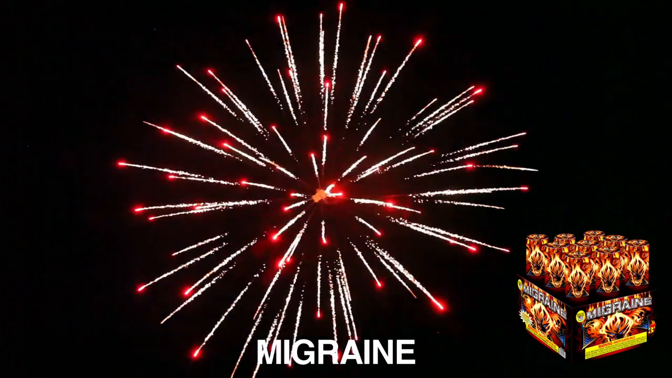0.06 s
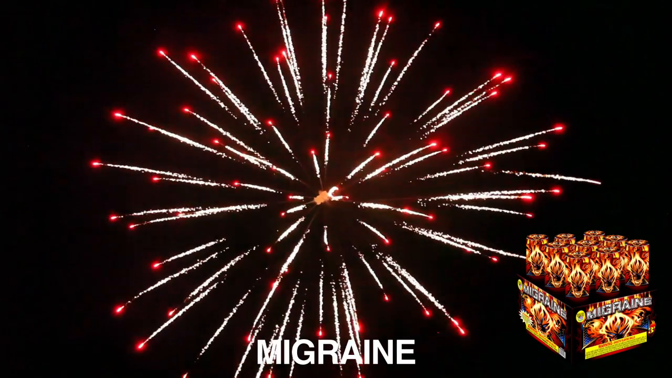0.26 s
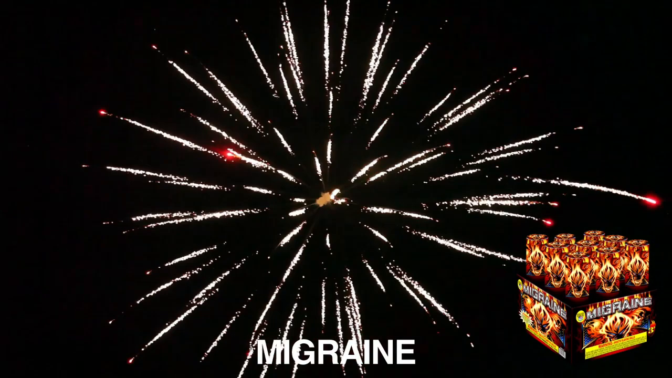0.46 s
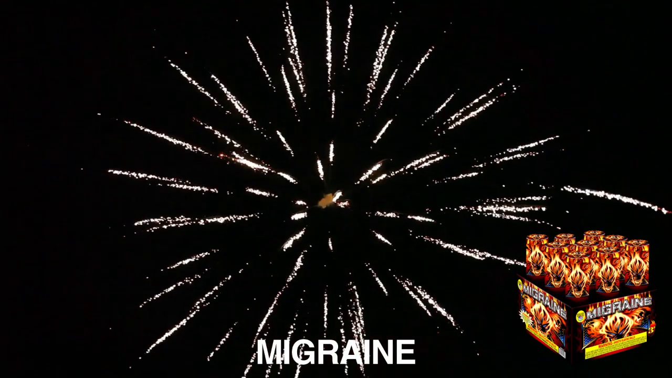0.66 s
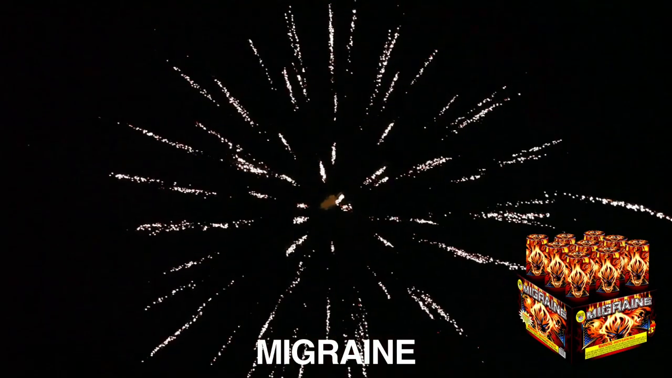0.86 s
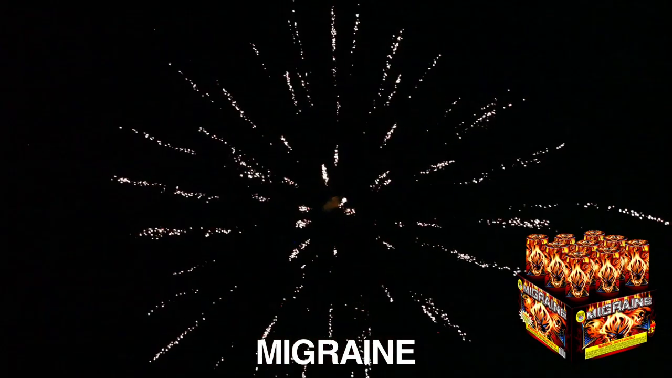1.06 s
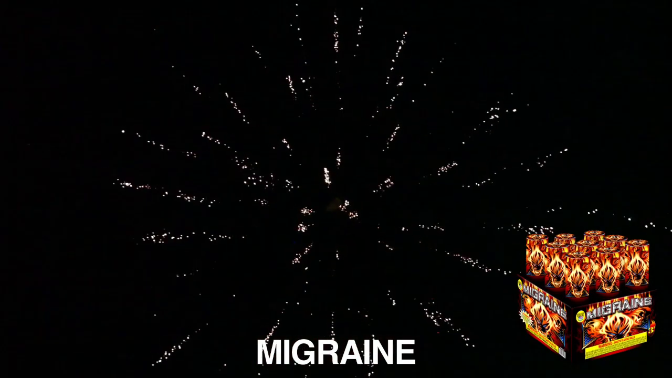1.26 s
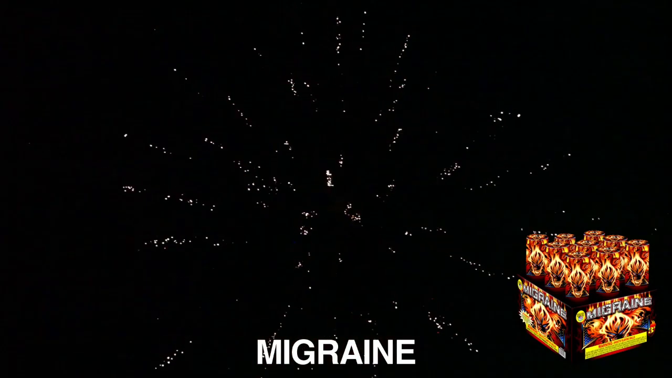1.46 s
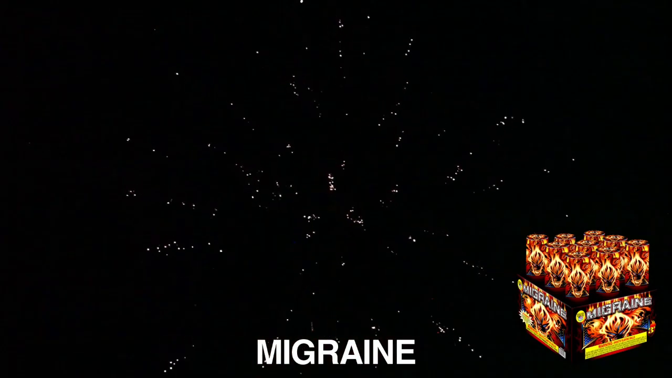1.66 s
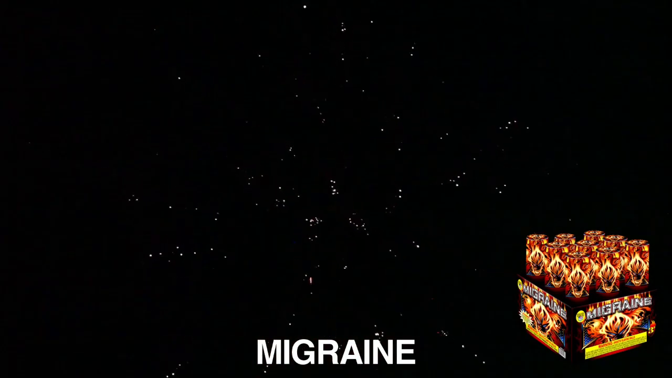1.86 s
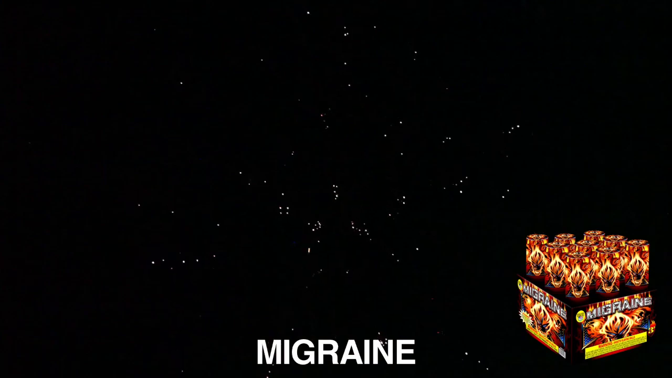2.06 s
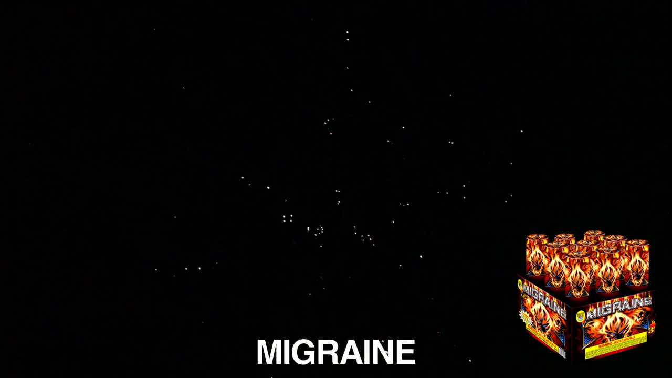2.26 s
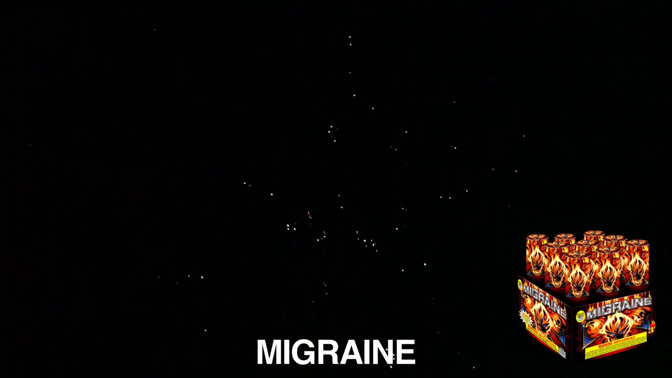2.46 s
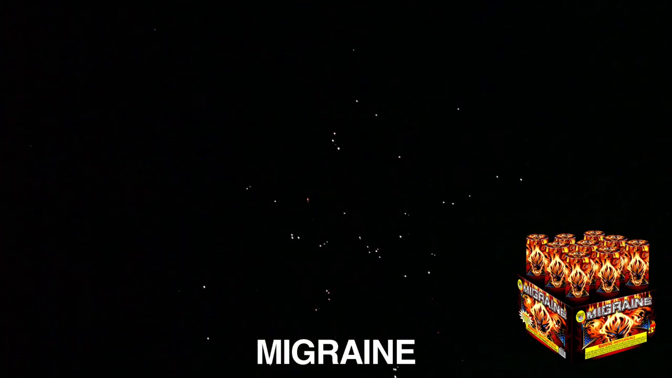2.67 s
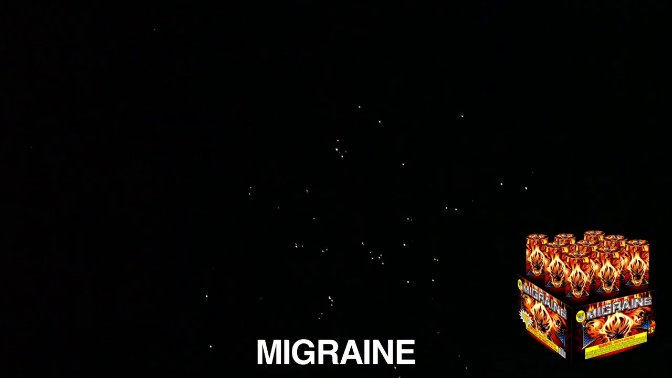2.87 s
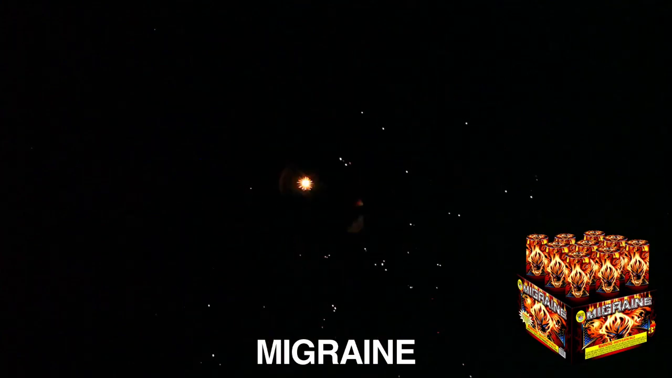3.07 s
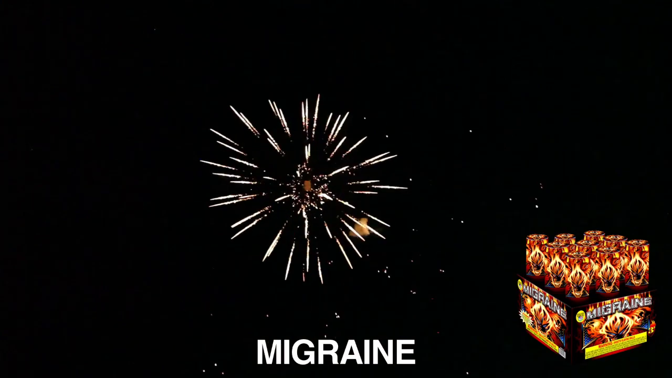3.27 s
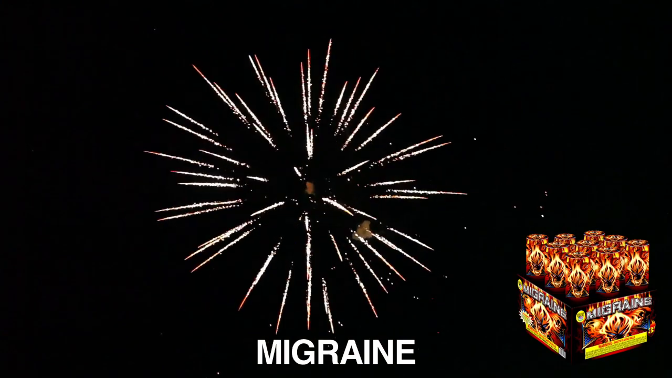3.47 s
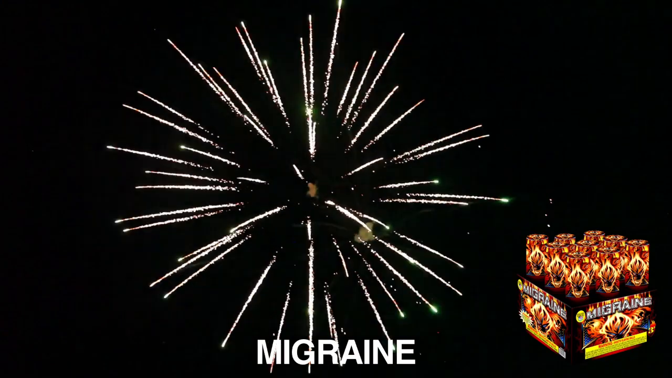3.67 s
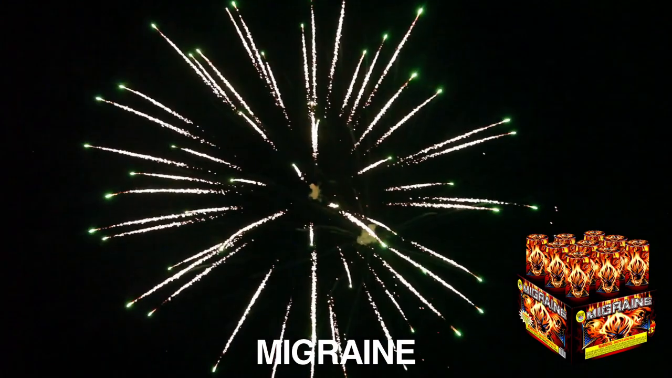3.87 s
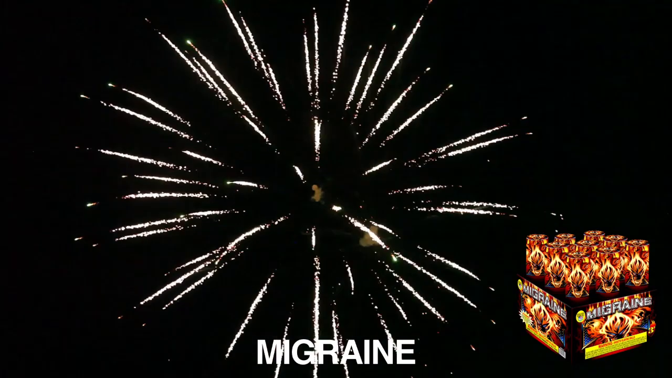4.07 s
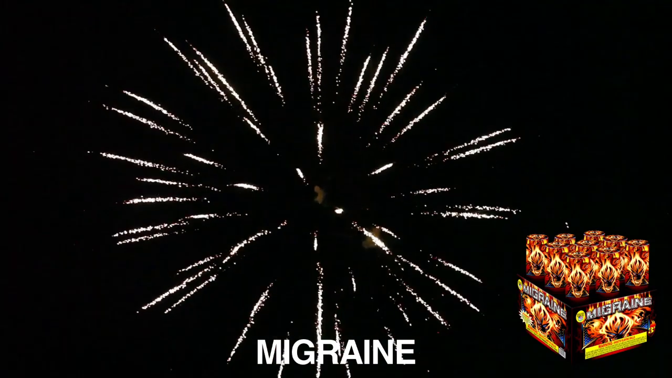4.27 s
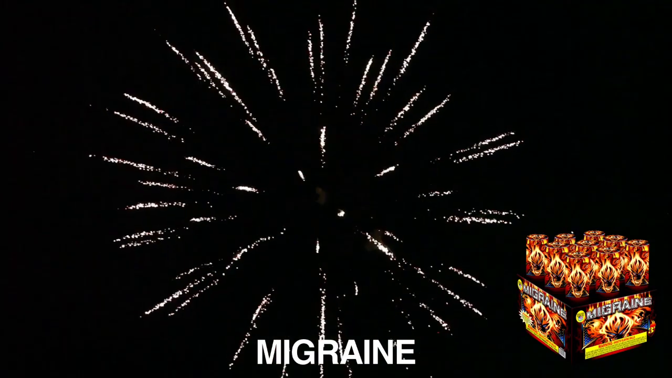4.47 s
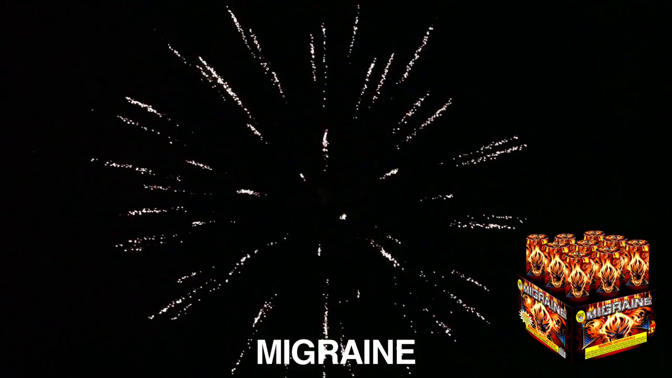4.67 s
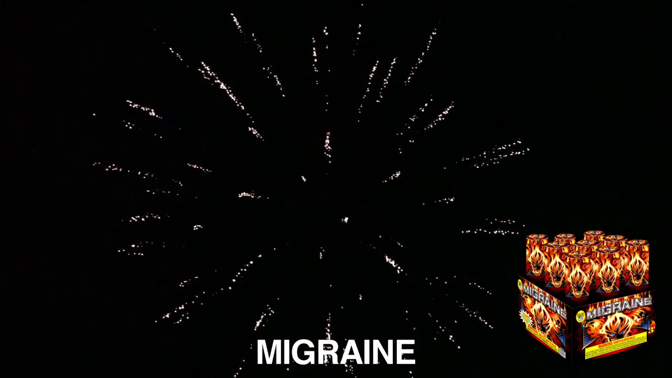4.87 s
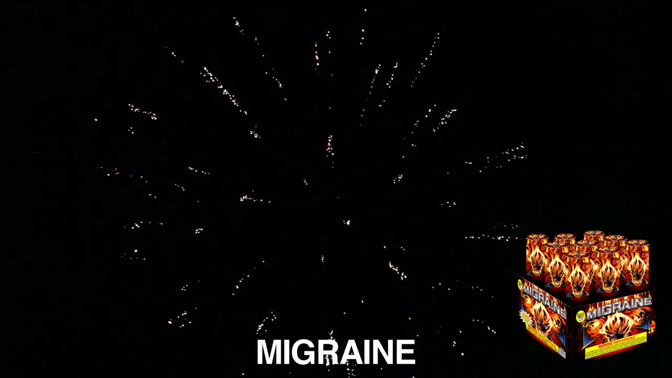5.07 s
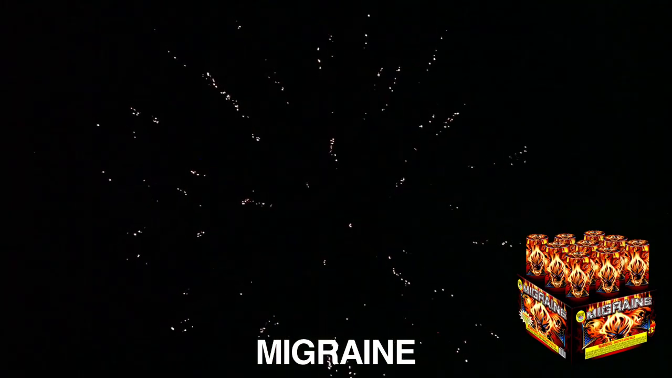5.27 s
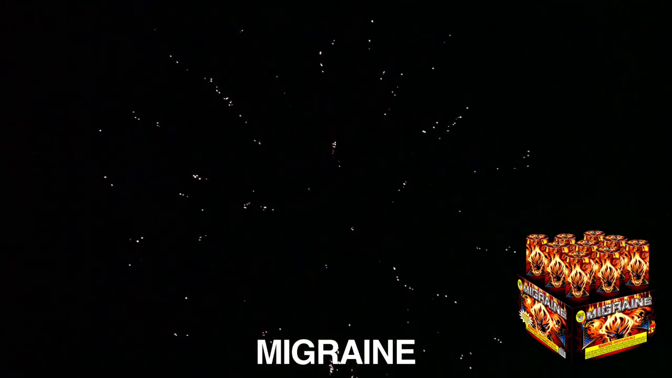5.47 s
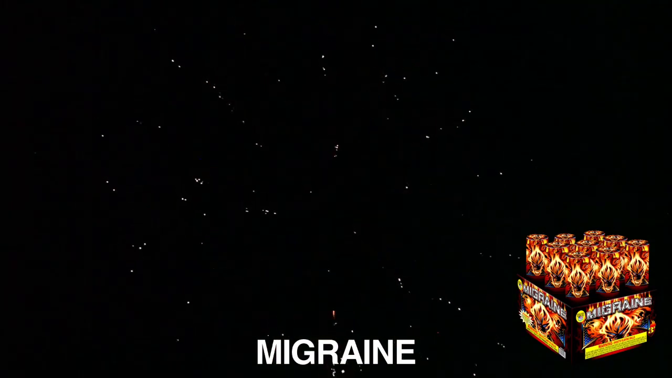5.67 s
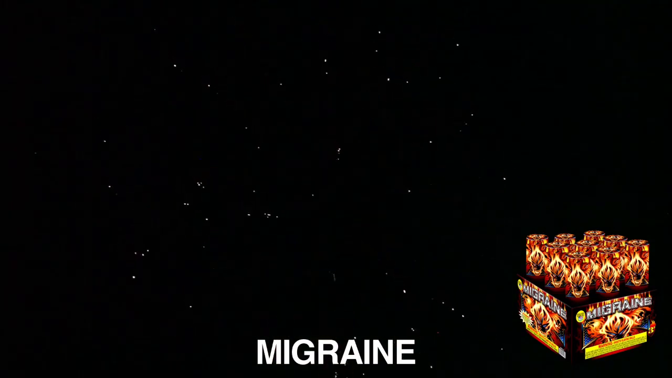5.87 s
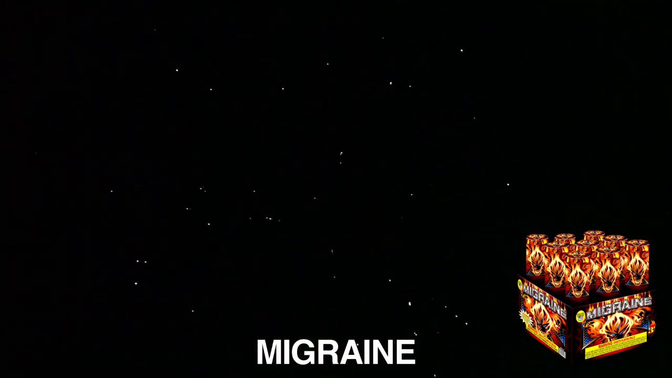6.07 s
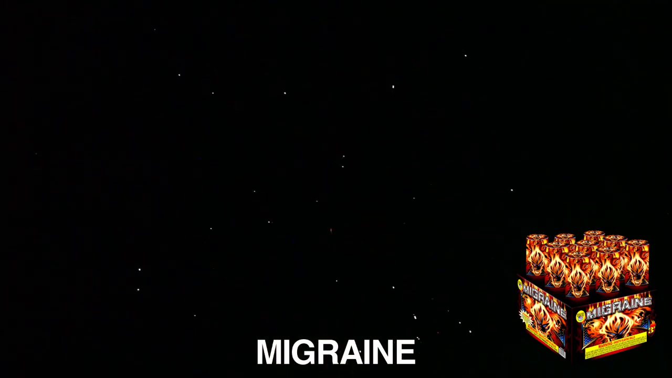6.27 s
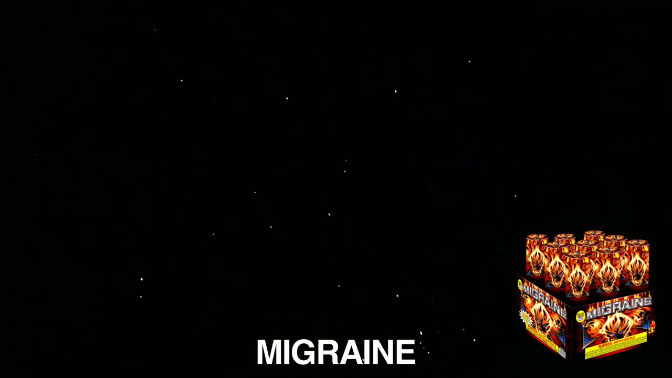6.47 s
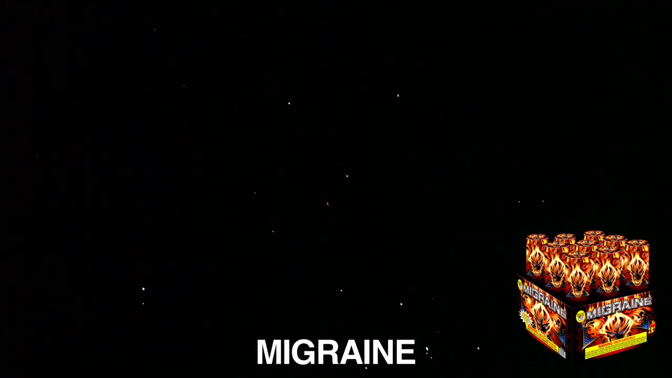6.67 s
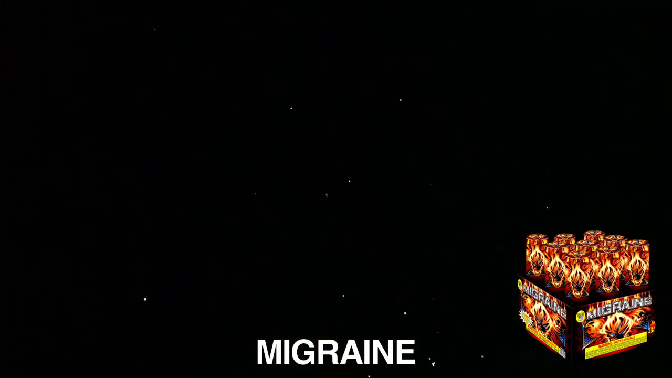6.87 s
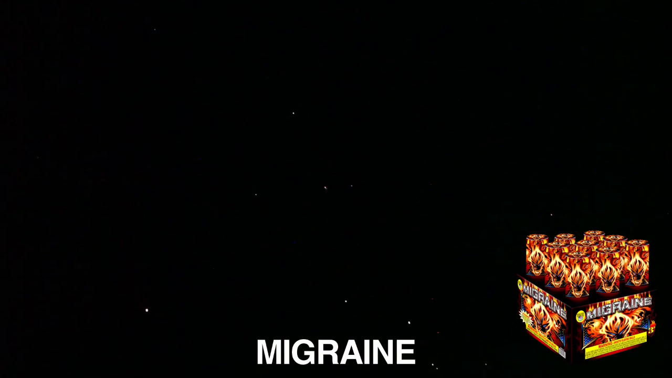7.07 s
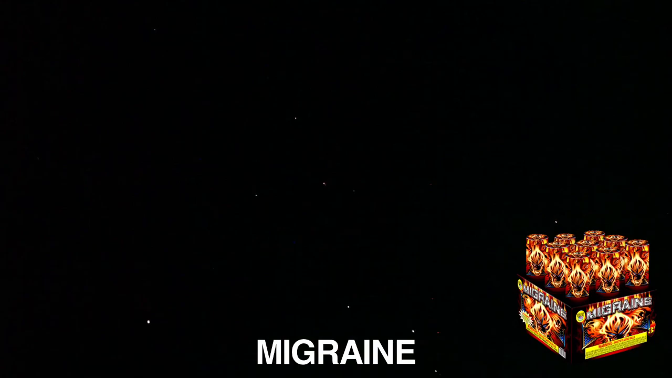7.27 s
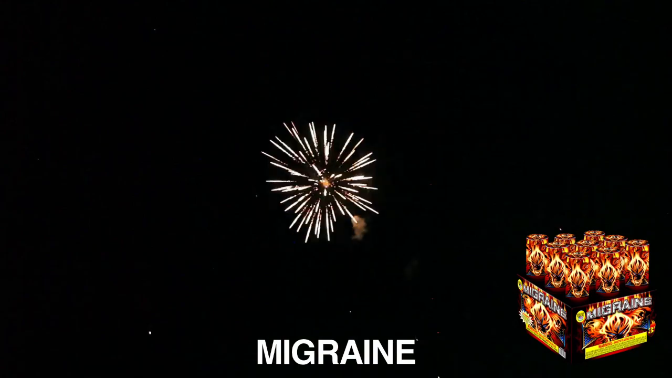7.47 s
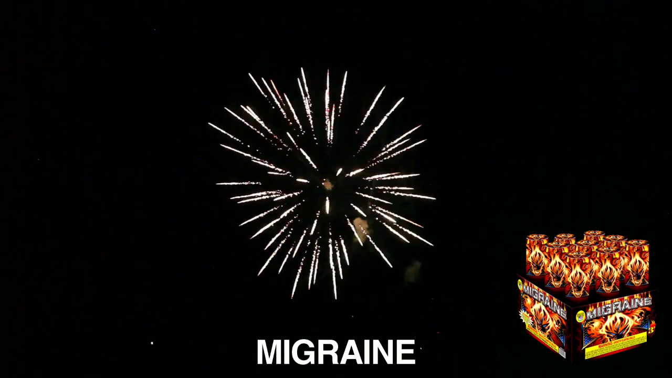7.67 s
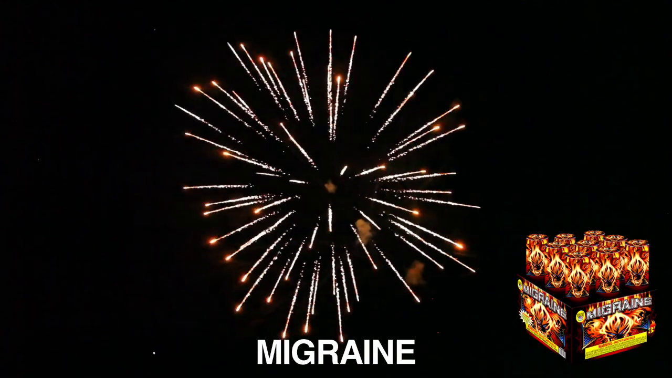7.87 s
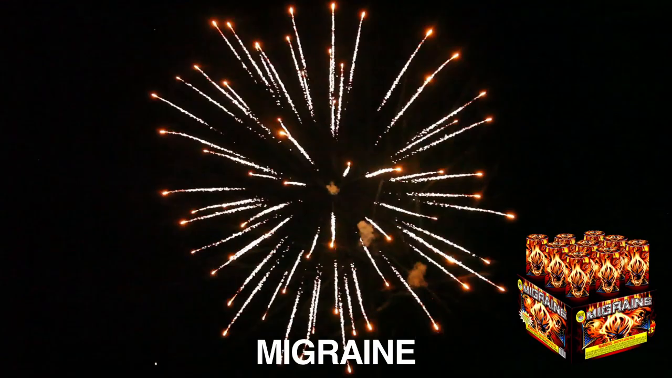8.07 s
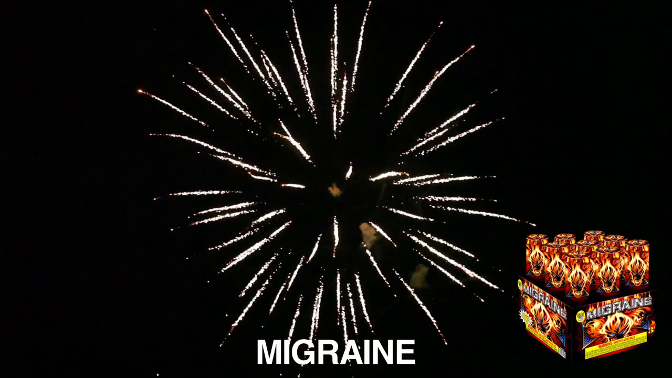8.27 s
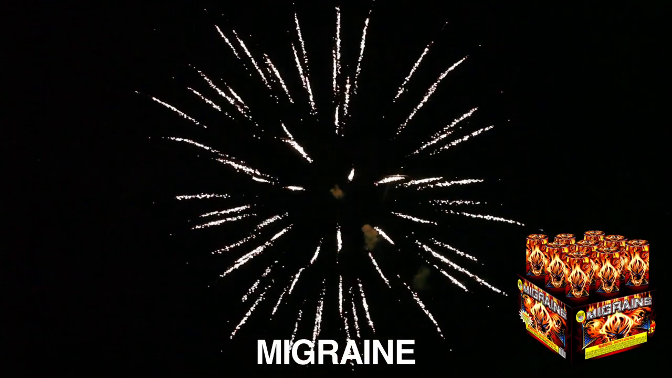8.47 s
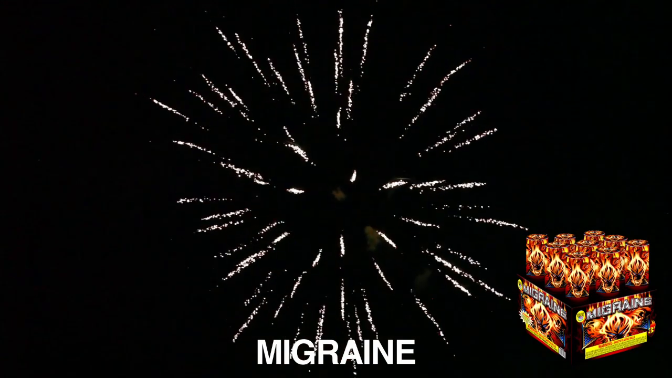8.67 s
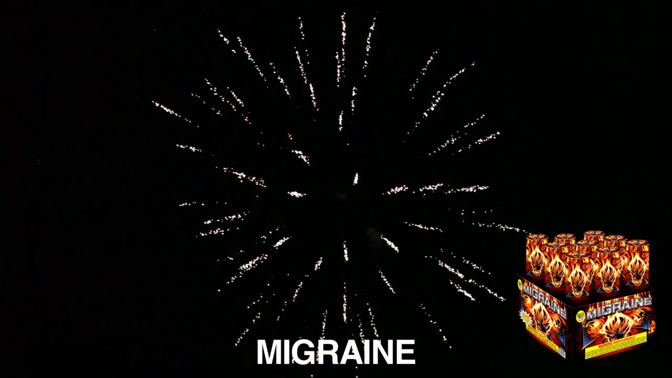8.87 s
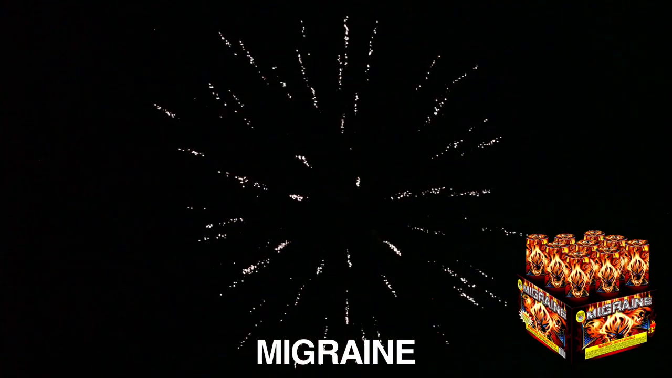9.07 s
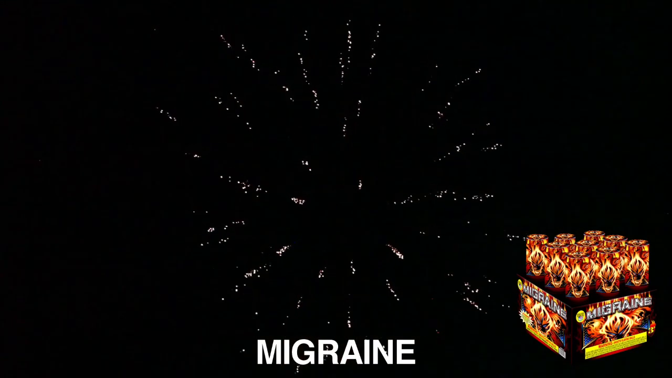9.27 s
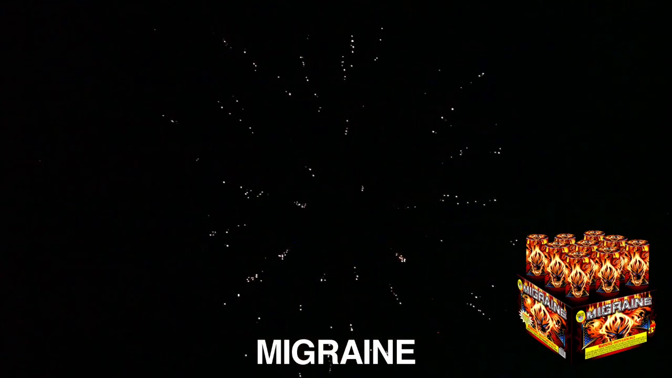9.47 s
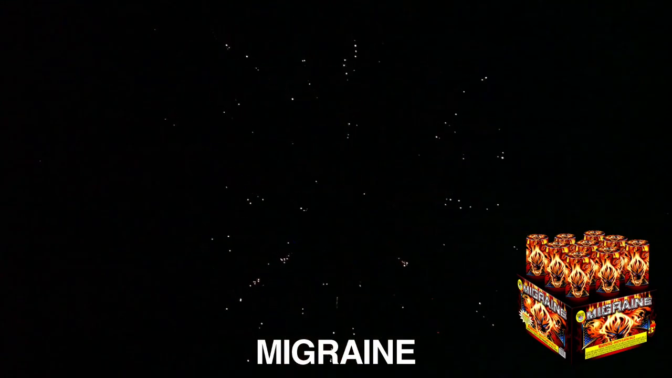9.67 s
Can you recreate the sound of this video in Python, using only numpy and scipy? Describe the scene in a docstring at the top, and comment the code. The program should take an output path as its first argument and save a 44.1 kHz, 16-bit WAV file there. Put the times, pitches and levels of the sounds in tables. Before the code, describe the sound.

Opens on the ducked, rolling echo of a firework burst just past. A mortar thumps with a small puff, a thin fuse hiss rises, and a shell explodes in a clipped boom and crack. Echoes roll off woods and slopes, growing duller, while stars sizzle. Another launch brings puffs and fluttering whirrs, then a second burst; a final launch thuds near the end. The overloaded microphone ducks and slowly recovers, lifting the hiss.

```python
"""A firework cake at night in open, wooded country, opening on the echo of a shell that has just burst.
A mortar thumps, a bright puff follows, a fuse hisses faintly, and the second shell bursts: shock, boom, crack.
The next shell leaves with more puffs, whirrs as it tumbles upward, hisses and bursts; a last mortar fires.
Woods, ground and slopes return each bang as coloured noise, ever duller; burning stars sizzle after each burst.
Bangs overload the microphone channel; its gain control ducks, then slowly lifts echoes and night hiss."""
import sys
import numpy as np
from scipy import signal
from scipy.fft import rfft, irfft, next_fast_len
from scipy.io import wavfile
from scipy.ndimage import uniform_filter1d, minimum_filter1d

SR = 44100
rng = np.random.default_rng(int(sys.argv[2]) if len(sys.argv) > 2 else 0)


def store_pcm(level_fs):
    """Save levels as 16-bit WAV."""
    pcm = np.round(np.clip(level_fs, -1, 1) * 32767).astype(np.int16)
    wavfile.write(sys.argv[1], SR, np.atleast_2d(pcm).T)


N = 429093
TIME = np.arange(N) / SR


def amp(db):
    """Amplitude factor of a level in dB."""
    return 10 ** (np.asarray(db) / 20)


def evened(x):
    """Scales to rms 1."""
    return x / np.sqrt(np.mean(x ** 2) + 1e-20)


def read(points, hz):
    """A spectrum in dB, joined on a log-frequency axis."""
    f, db = np.transpose(points)
    return np.interp(np.log(hz + 1), np.log(f), db)


def add(mix, s, sound):
    """Mixes in a sound that starts at s seconds, trimmed to the scene."""
    start = round(s * SR)
    sound = sound[max(-start, 0):]
    part = mix[max(start, 0):][:len(sound)]
    part += sound[:len(part)]


def coloured(points, count):
    """Steady noise of rms 1 with the given spectrum and random phases."""
    hz = np.fft.rfftfreq(count, 1 / SR)
    phases = np.exp(2j * np.pi * rng.random(len(hz)))
    return evened(irfft(amp(read(points, hz)) * phases, count))


def shaped(field, size):
    """Noise whose amplitude in a 1 kHz band follows field(Hz, s)."""
    overlap = size - size // 4
    hz, t, z = signal.stft(rng.standard_normal(N), SR, nperseg=size, noverlap=overlap)
    z = z * field(hz[:, None], t) * np.sqrt(SR / 2000)
    return signal.istft(z, SR, nperseg=size, noverlap=overlap)[1][:N]


def hump(hz, centre_hz, octaves):
    """A bell on the log-frequency axis."""
    return np.exp(-.5 * (np.log2((hz + 1) / centre_hz) / octaves) ** 2)


def bell_noise(centre_hz, octaves, count):
    """White noise filtered to a bell-shaped band."""
    bell = hump(np.fft.rfftfreq(count, 1 / SR), centre_hz, octaves)
    return irfft(rfft(rng.standard_normal(count)) * bell, count)


def band(centre_hz, octaves, count):
    """Noise in a bell-shaped band, at 0 dB in a 1 kHz band at its centre."""
    return bell_noise(centre_hz, octaves, count) * np.sqrt(SR / 2000)


def patches(shape, size):
    """Smooth random field of rms 1."""
    window = np.outer(np.hanning(size[0]), np.hanning(size[1]))
    return evened(signal.fftconvolve(rng.standard_normal(shape), window, "same"))


def blast(t, length):
    """A shock front followed by its suction."""
    return (1 - t / length) * np.exp(-t / length)


def ring(t, modes, pitch):
    """The low, quickly dying ring of a bang, as a sum of decaying sines."""
    return sum(amp(db - 60 * t / t60) * np.sin(2 * np.pi * hz * pitch * t) for hz, db, t60 in modes)


def dying(t, db, t60, rise):
    """Envelope that swells for rise seconds and then dies by 60 dB every t60 seconds."""
    return amp(db - 60 * np.maximum(t - rise, 0) / t60) * np.minimum(t / rise, 1) ** 2


# shells bursting: t/s, blast level/dB, echo level/dB, size as a factor on the boom's pitch
BURSTS = [(-0.142, -4, 0, 1.0), (3.434, -2, 0, 0.96), (7.7273, -3.5, -0.2, 1.02)]
# ring of the boom: f/Hz, level/dB, t60/s
BOOM = [(126.5, 42, 0.1), (166, 46, 0.085), (207.7, 49.5, 0.085), (384, 44, 0.077), (787.6, 51, 0.037)]
# colour of the dull noise in every bang, bursts and launches alike: f/Hz, level/dB
BODY = [(25, -22), (70, -13.5), (140, -1.5), (240, 5.5), (420, 1), (600, -17.5), (1200, -26.5), (3000, -53)]
# colour of a burst's crack: f/Hz, level/dB
BURST_CRACK = [(200, -6), (900, 6.5), (1600, -1), (3000, -9), (5500, -5.5), (9000, -22), (16000, -33)]


def bursts(snap_db=30, snap_t60=0.033):
    """A shock, its boom, and the crack scattered by things nearby."""
    out, t = np.zeros(N), np.arange(SR // 4) / SR
    for s, db, _, pitch in BURSTS:
        shock = amp(53.5) * blast(t, length=0.00092)
        body = coloured(BODY, len(t)) * dying(t, db=38.5, t60=0.16, rise=.003)
        scatter = dying(t, db=33.5, t60=0.069, rise=0.01)
        snap = dying(t, snap_db, snap_t60, rise=.0005)
        crack = coloured(BURST_CRACK, len(t)) * (scatter + snap)
        add(out, s, amp(db) * (shock - ring(t, BOOM, pitch) + body + crack))
    return out


def spreading(delay, fade):
    """Amplitude of an echo: it builds up to the first return, then thins out with the distance travelled."""
    first, db, spread_db, ground_db = fade
    travelled = np.maximum(delay, first)
    build_up = np.clip(delay / first, 0, 1) ** 2
    return build_up * amp(db - spread_db * np.log10(travelled) - ground_db * travelled)


# how the woods' echo fades with delay: first return t/s, level/dB in a 1 kHz band at 1 s from
# spreading alone, spreading/dB per tenfold delay, ground loss/dB per s
BURST_FADE = (0.06, -17.5, 13, 5)
LAUNCH_FADE = (0.09, -42, 21.5, 5)
# wooded slopes that swell the echo: delay t/s, level/dB in a 1 kHz band, t60/s, rise/s
BURST_SLOPES = [(.02, 4, 0.24, 0.031), (.29, -13, 1.25, .14), (0.974, -19, 2.3, .025), (1.04, -16, 2.4, .1),
                (2.3, -26.5, 3.6, .14), (3.581, -34, 2.5, 0.28)]
LAUNCH_SLOPES = [(.012, -6.5, 0.15, .014), (.4, -37, 3.6, .2)]
# colour laid over the woods' echo: f/Hz, level/dB
BURST_COLOUR = [(25, -31), (60, -10), (120, 1.5), (290, 4.5), (470, -10.5), (750, 2.5), (1060, 2.5),
                (1300, 1.5), (1600, 2), (2800, -4), (5200, -10), (8000, -18.5), (15000, -37)]
LAUNCH_COLOUR = [(40, -24), (80, -5.5), (165, 16.5), (320, 4), (600, 3.5), (1100, 1.5), (1900, -1),
                 (2800, 0), (4600, -7), (8000, -15.5), (15000, -32.5)]


def echoes(shots, fade, slopes, colour, air_db=12, air_power=1.57, patchy_db=1.8, flicker_db=1.0):
    """Trees scatter each bang back, swelling with every slope; air eats more treble the longer it travels."""
    def field(hz, t):
        loss_db = air_db * (hz / 5000) ** air_power  # per second
        power = 0
        for s, _, echo_db, _ in shots:
            delay = np.maximum(t - s, 0)
            swells = sum(dying(np.maximum(delay - start, 0), db, t60, rise) ** 2
                         for start, db, t60, rise in slopes)
            returned = spreading(delay, fade) ** 2 + swells
            power = power + returned * amp(echo_db - loss_db * delay) ** 2
        fine_db = patchy_db * patches(power.shape, size=(7, 13))
        broad_db = flicker_db * patches(power.shape, size=(61, 7))
        return np.sqrt(power) * amp(read(colour, hz) + fine_db + broad_db)
    return shaped(field, size=512)


def grainy(x, grain_db=0.54, ground_delay=0.001926, ground_share=0.11):
    """Single trunks roughen the echo's level; a bounce off the ground (delay in s) combs it."""
    x = x * amp(grain_db * patches((1, N), size=(1, 160))[0])
    return x + ground_share * np.interp(TIME - ground_delay, TIME, x)


# how the roll fades with delay: first return t/s, level/dB in a 1 kHz band at 1 s from
# spreading alone, spreading/dB per tenfold delay, ground loss/dB per s
ROLL_FADE = (0.17, -10.5, 21.5, 1.0)
# its centre sinks to a deep rumble as it skims the ground
ROLL_START_HZ, ROLL_END_HZ, ROLL_SINK_S = 277, 80, .7


def roll(octaves, near_db=16, near_t60=0.33, near_rise=.09):
    """The boom comes back strongly from the ground nearby, then rolls on, ever deeper."""
    def centre_hz(delay):
        sink = np.exp(-np.maximum(delay, 0) / ROLL_SINK_S)
        return ROLL_END_HZ + (ROLL_START_HZ - ROLL_END_HZ) * sink
    out = np.zeros(N)
    for s, _, echo_db, _ in BURSTS:
        noise = shaped(lambda hz, t: hump(hz, centre_hz(t - s), octaves), size=2048)
        delay = np.maximum(TIME - s, 0)
        near = dying(delay, near_db, near_t60, near_rise)
        out += noise * amp(echo_db) * np.hypot(spreading(delay, ROLL_FADE), near)
    return out


# coloured noises after a burst: slaps off the land and, at .33 s, the bright sizzle of burning stars:
# delay t/s, level/dB in a 1 kHz band, centre f/Hz, width/octaves, t60/s, rise/s
BURST_SLAPS = [(0.052, -11.5, 4750, 0.31, 0.97, 0.0094), (.33, -13.5, 2590, 0.59, 1.9, 0.068),
               (.992, -13.5, 1300, 0.86, 0.17, 0.0048), (1.335, -13, 330, .4, .15, 0.0074),
               (2.992, -16, 398, 0.58, 0.25, .005), (3.38, -32, 1500, 0.21, 0.25, 0.02)]
# slaps off the land after a launch: same columns
LAUNCH_SLAPS = [(.1, -8, 246, .5, 0.64, .02), (.48, -39.5, 3747, 0.39, 1.3, 0.041),
                (1.08, -30, 1750, 0.17, .4, .03), (1.26, -29.5, 1847, 0.19, 0.29, 0.013)]


def slaps_and_sizzle(shots, rows):
    """Each row follows every bang with its own band of noise, which swells and dies."""
    out, t = np.zeros(N), np.arange(SR) / SR
    for delay, db, centre_hz, octaves, t60, rise in rows:
        for s, _, echo_db, _ in shots:
            add(out, s + delay, dying(t, db + echo_db, t60, rise) * band(centre_hz, octaves, len(t)))
    return out


# night air and microphone hiss: f/Hz, level/dB in a 1 kHz band
NIGHT = [(20, -37.5), (45, -28.5), (90, -31.5), (220, -33.5), (400, -35.5), (800, -37.5), (1500, -54),
         (2200, -53), (3000, -54.5), (4200, -56.5), (7000, -57), (15000, -57)]


def night(gust_db=3, gust_hz=90):
    """Steady hiss over a low rumble that breezes swell and thin."""
    def field(hz, t):
        gusts = patches((1, len(t)), size=(1, 25))
        return amp(read(NIGHT, hz) + gust_db * gusts / (1 + (hz / gust_hz) ** 2))
    return shaped(field, size=2048)


# mortars firing: t/s, blast level/dB, echo level/dB, size as a factor on the pitch of push and thump
LAUNCHES = [(1.2069, 1.9, 2.5, 0.81), (5.1296, -1.2, 0.5, 0.91), (9.1231, 1, 0, 1.07)]
# ring of the emptied tube: f/Hz, level/dB, t60/s
THUMP = [(136, 20.2, 0.017), (212, 21.4, 0.1), (336.5, 26.1, 0.051), (448, 20.7, .06)]
# colour of the gas tearing out: f/Hz, level/dB
LAUNCH_CRACK = [(300, 8.5), (1000, -1), (1550, -6), (2000, 5.5), (2400, 1), (3050, 4.5), (3900, -7.5),
                (5200, -6), (9000, -26), (16000, -39)]


def launches(tube_delay=.008, lowest_hz=80):
    """The lift charge pushes the air, gas tears out of the muzzle, and the emptied tube thumps."""
    out, t = np.zeros(N), np.arange(SR // 4) / SR
    for s, db, _, pitch in LAUNCHES:
        push = dying(t, db=21.5, t60=0.02, rise=.0015) * np.sin(2 * np.pi * 290 * pitch * t)
        body = coloured(BODY, len(t)) * dying(t, db=19, t60=.18, rise=0.0089)
        gas = coloured(LAUNCH_CRACK, len(t)) * dying(t, db=22.5, t60=0.03, rise=0.0094)
        add(out, s, amp(db) * (push + body + gas))
        add(out, s + tube_delay, amp(db + 4.5) * ring(t, THUMP, pitch))
    # a narrow tube radiates no deep bass
    return signal.sosfilt(signal.butter(2, lowest_hz, "highpass", fs=SR, output="sos"), out)


# short, bright puffs just after a launch: t/s, level/dB, t60/s
PUFFS = [(1.341, -12, .15), (5.213, -1.5, 0.11), (5.268, -5.5, 0.12), (5.326, -12, 0.054),
         (9.228, -7, 0.044)]
# their colour: f/Hz, level/dB
PUFF_COLOUR = [(300, 10), (1100, 11), (2800, 3), (4400, 1.5), (6000, -15), (10000, -33), (14000, -38)]


def puffs():
    """Short, bright puffs of noise, from the launch's echo or the tumbling shell."""
    out, t = np.zeros(N), np.arange(SR // 4) / SR
    for s, db, t60 in PUFFS:
        add(out, s, coloured(PUFF_COLOUR, len(t)) * dying(t, db, t60, rise=0.0044))
    return out


# hiss of a fuse on its way up: start t/s, end t/s, level/dB in a 1 kHz band, centre f/Hz
FUSES = [(1.9, 3.44, -45, 3140), (5.901, 7.727, -47, 2510)]


def fuses(octaves=0.28, fade=0.62):
    """A thin, narrow hiss that fades in over fade seconds and lasts until the shell bursts."""
    out = np.zeros(N)
    for start, end, db, centre_hz in FUSES:
        t = np.arange(0, end - start, 1 / SR)
        hiss = band(centre_hz, octaves, next_fast_len(len(t)))[:len(t)]
        add(out, start, amp(db) * np.minimum(t / fade, 1) * hiss)
    return out


# swishes of the tumbling shell, one a turn: t/s of the middle, level/dB, glide/octaves per s
WHIRRS = [(5.412, -18.5, 23.5), (5.476, -28, 0), (5.532, -21, -4.5), (5.608, -19.5, 17), (5.68, -19, -17),
          (5.77, -22, 12), (5.854, -22.5, -4), (5.95, -30, 2.5)]
WHIRR_HZ, WHIRR_S = 2454, .022  # whistle pitch mid-swish; time scale of the swish


def whirr(tone_db=-2.5, rush_db=-6, rush_hz=2550, rush_octaves=0.35):
    """The climbing shell swishes once each turn, with a short gliding whistle in the swish."""
    out, t = np.zeros(N), np.arange(-SR // 16, SR // 16) / SR
    for s, db, glide in WHIRRS:
        wobble = 0.03 * patches((1, len(t)), size=(1, 90))[0]  # octaves
        hz = WHIRR_HZ * 2 ** (glide * t + wobble)
        whistle = np.sin(2 * np.pi * np.cumsum(hz) / SR)
        rush = evened(bell_noise(rush_hz, rush_octaves, len(t)))
        swish = np.exp(-(2 * t / WHIRR_S) ** 2)
        add(out, s + t[0], amp(db) * swish * (amp(tone_db) * whistle + amp(rush_db) * rush))
    return out


def scene():
    """Bangs, the noises that follow them, the shells' small noises and the night."""
    burst_woods = echoes(BURSTS, BURST_FADE, BURST_SLOPES, BURST_COLOUR)
    launch_woods = echoes(LAUNCHES, LAUNCH_FADE, LAUNCH_SLOPES, LAUNCH_COLOUR)
    woods = amp(-1.15) * grainy(burst_woods + launch_woods)
    followers = slaps_and_sizzle(BURSTS, BURST_SLAPS) + slaps_and_sizzle(LAUNCHES, LAUNCH_SLAPS)
    aftermath = woods + amp(-1.0) * roll(octaves=0.55) + followers
    return (bursts() + aftermath + night() + launches() + puffs() + fuses() + whirr())[None]


def power_db(x, size):
    """Running level over the latest size samples."""
    return 10 * np.log10(abs(uniform_filter1d(x ** 2, size, origin=size // 2 - 1)) + 1e-12)


CEILING, EDGE_HZ = .87, 15700  # clipping level (full scale 1) and upper band limit


def record(dry, threshold_db=-12, depth_db=44, start_db=39, recovery=1.549, attack=0.013, limit_db=-4):
    """Gain control comes too late for each bang, which clips; it recovers slowly, before limiter and band limit."""
    over_db = np.clip(power_db(dry[0], size=440) - threshold_db, 0, depth_db)
    over_db[0] = start_db  # still ducked by the first burst
    # peaks are held, and the held dB decay with a time constant of recovery seconds
    fade = np.exp(-TIME / recovery)
    held_db = np.maximum.accumulate(over_db / fade) * fade
    ramp = np.clip(attack * SR - np.arange(SR // 20), 0, 1)  # the gain slides down over the attack time
    duck_db = start_db + signal.oaconvolve(held_db - start_db, ramp / ramp.sum())[:N]
    bass_cut = signal.butter(2, 30, "highpass", fs=SR, output="sos")  # the microphone's lower limit
    driven = signal.sosfilt(bass_cut, dry[0]) * amp(-duck_db) / CEILING
    clipped = CEILING * driven / (1 + driven ** 4) ** .25
    clipped = signal.lfilter(*signal.butter(1, 7, "highpass", fs=SR), clipped)  # removes any offset
    loud_db = 10 * np.log10(abs(uniform_filter1d(clipped ** 2, size=400)) + 1e-12)
    cut_db = minimum_filter1d(np.minimum(limit_db - loud_db, 0), size=700)
    limited = clipped * amp(uniform_filter1d(cut_db, size=300))
    band_limit = signal.firwin(511, EDGE_HZ, window=("kaiser", 9), fs=SR)
    return signal.oaconvolve(limited, band_limit, "same")[None]


dry = scene()
out = record(dry)
store_pcm(out)
```